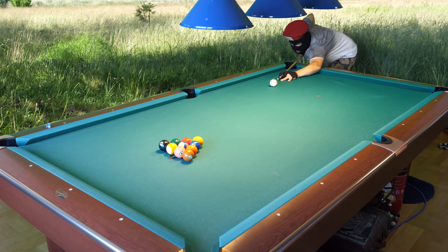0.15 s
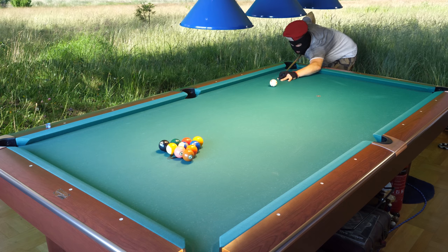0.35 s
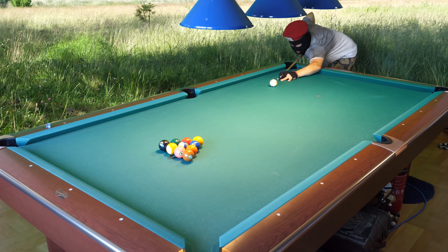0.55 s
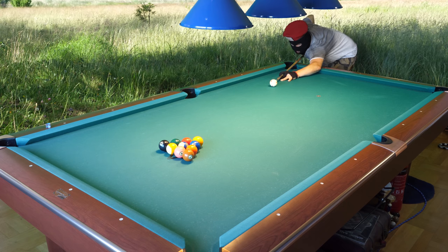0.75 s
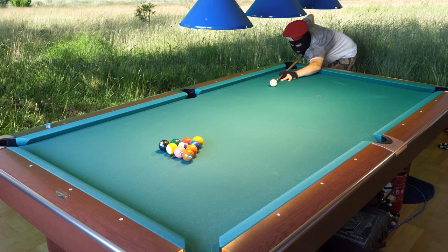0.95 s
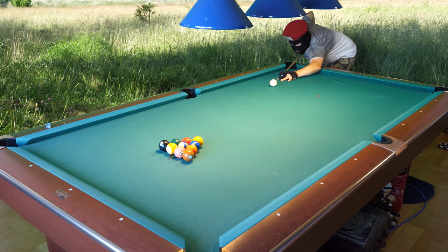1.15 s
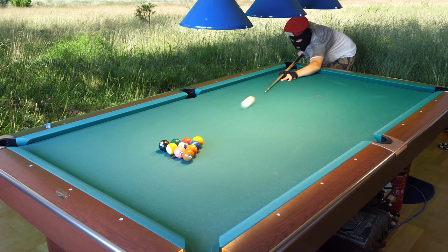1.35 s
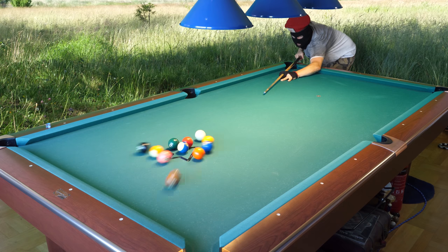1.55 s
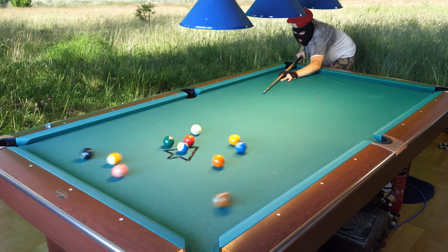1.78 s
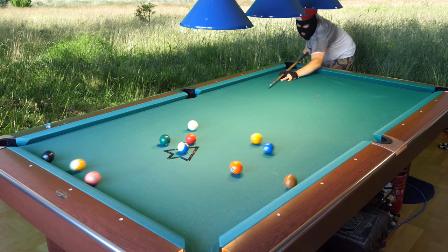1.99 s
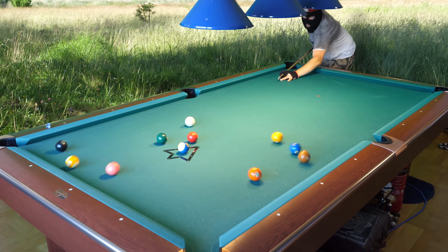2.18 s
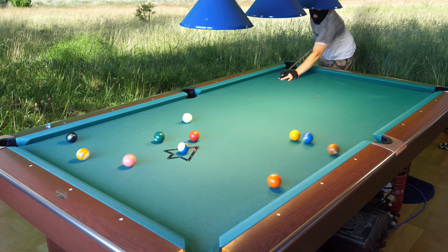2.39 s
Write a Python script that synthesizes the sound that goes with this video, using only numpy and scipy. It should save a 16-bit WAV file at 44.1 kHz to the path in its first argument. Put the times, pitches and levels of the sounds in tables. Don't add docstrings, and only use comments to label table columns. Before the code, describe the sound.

A billiard break shot cracks sharply into the rack, followed by cushion thuds and stray ball clicks

```python
import sys
import numpy as np
from scipy import signal
from scipy.fft import rfft, irfft, next_fast_len
from scipy.io import wavfile
from scipy.ndimage import uniform_filter1d, minimum_filter1d

SR = 44100
rng = np.random.default_rng(int(sys.argv[2]) if len(sys.argv) > 2 else 0)


def transcribe(u):
    v = np.clip(np.atleast_2d(u).T, -1, 1)
    q = np.round(v * 32767).astype(np.int16)
    wavfile.write(sys.argv[1], SR, q)


def volts_from_decibels(level):
    exponent = np.asarray(level, float) / 20
    return 10 ** exponent


N = 106942


def unit(x):
    return x / np.sqrt(np.mean(x ** 2) + 1e-20)


def along(points, hz):
    f, v = np.transpose(points)
    return np.interp(np.log(hz + 1), np.log(f + 1), v)


def filtered(x, response):
    m = next_fast_len(x.shape[-1] + 8192)
    hz = np.fft.rfftfreq(m, 1 / SR)
    return irfft(rfft(x, m) * response(hz), m)[..., :x.shape[-1]]


def resonance(hz, centre, width):
    return 1j * hz * width / (centre * centre - hz * hz + 1j * hz * width)


def pair(noise, alike):
    def weights(hz):
        turn = np.arccos(np.clip(along(alike, hz), -1, 1)) / 2
        return np.array([np.cos(turn), np.sin(turn)])
    mid, side = filtered(noise, weights)
    return np.array([mid + side, mid - side])


def rush(spectrum, alike):
    noise = pair(rng.standard_normal((2, N)), alike)
    return unit(filtered(noise, lambda hz: volts_from_decibels(along(spectrum, hz))))


def ring(modes, scatter_db, attack_s):
    t = np.arange(SR // 2) / SR
    tones = np.zeros(len(t))
    for hz, db, t60 in modes:
        level = db + scatter_db * rng.normal()
        tones += volts_from_decibels(level - 60 * t / t60) * np.sin(2 * np.pi * hz * t)
    return tones * (1 - np.exp(-t / attack_s))


def add(track, s, sound):
    k = round(s * SR)
    track[..., k:k + sound.shape[-1]] += sound[..., :track.shape[-1] - k]


# (frequency [Hz], level [dB/Hz])
BALL_SPECTRUM = [(250, -28), (800, -14), (1800, 1.5), (2800, -2.5), (3700, -18), (4600, -35), (7000, -43),
                 (16000, -43.5)]
# (frequency [Hz], level [dB], T60 [s])
BALL_MODES = [(14200, -29, .003), (12000, -38, .003)]


def click(sharp=1):
    hz = np.fft.rfftfreq(4096, 1 / SR)
    cepstrum = irfft(np.log(volts_from_decibels(along(BALL_SPECTRUM, hz / sharp))))
    cepstrum[1:2048] *= 2
    cepstrum[2049:] = 0
    swing = irfft(np.exp(rfft(cepstrum)))
    return swing / np.abs(swing).max() + ring(BALL_MODES, 1, .0002)[:4096]


RACK_S, RACK_DB = 1.545, 18
SPREAD_S, FADE_DB = .012, 20
RACK_SHARP, SHARP_SCATTER = 1.105, .13
ROOM_DB = 12


def rack():
    out, burst = np.zeros((2, N)), np.zeros(SR // 4)
    late = np.append(0, np.sort(rng.exponential(1, 18)))
    for u in late:
        sharp = RACK_SHARP * np.exp(SHARP_SCATTER * rng.normal())
        add(burst, SPREAD_S * u, volts_from_decibels(-FADE_DB * u) * click(sharp))
    add(out, RACK_S, volts_from_decibels(RACK_DB) * room(burst, ROOM_DB))
    return out


# (time [s], level [dB])
LONE_CLICKS = [
    (2.2874, 3),
    (2.4203, -5.5),
]


def lone_clicks():
    out = np.zeros((2, N))
    for s, db in LONE_CLICKS:
        add(out, s, volts_from_decibels(db) * room(click(), ROOM_DB))
    return out


# (frequency [Hz], width [Hz], level [dB])
TIP_RESONANCES = [(865, 110, -5), (380, 220, 1.5), (537, 400, 1.5), (1113, 710, -5), (1600, 1500, -2.5),
                  (2470, 410, 3), (200, 180, -13), (5000, 4000, 0)]
# (frequency [Hz], level [dB], T60 [s])
SHAFT_MODES = [(339.8, -4.5, 0.3), (404.5, -4.5, .15), (1102, -7, 0.078), (1447, -10, 0.12),
               (1720, -8, 0.11), (2140, -6.5, 0.17), (2482, -10, 0.36), (3000, -27.5, 0.18),
               (3273, -1.5, 0.11), (3640, -15, .15), (3880, -16.5, .15), (4820, -35.5, .12),
               (5280, -19.5, 0.15)]
# (frequency [Hz], level [dB], T60 [s])
KNOCK_MODES = [(850, -1, .07), (1150, -8, .04)]
CUE_S, CUE_DB, CUE_ROOM_DB = 1.3158, 1, 12.5
TIP_DB, SHAFT_DB, CRACK_DB = 7, -18.5, -6.5
LEATHER_S = .00025


def cue():
    out, t = np.zeros((2, N)), np.arange(SR // 2) / SR
    blow = np.sin(np.pi * np.minimum(t / LEATHER_S, 1)) ** 2
    knock = filtered(blow, lambda hz: sum(volts_from_decibels(db) * resonance(hz, c, w) for c, w, db in TIP_RESONANCES))
    sound = volts_from_decibels(TIP_DB) * knock / np.abs(knock).max()
    sound += volts_from_decibels(SHAFT_DB) * ring(SHAFT_MODES, 0, .00043)
    sound[0] += volts_from_decibels(CRACK_DB)
    add(out, CUE_S, volts_from_decibels(CUE_DB) * room(sound, CUE_ROOM_DB))
    add(out, CUE_S, volts_from_decibels(CUE_DB) * ring(KNOCK_MODES, 0, .0001))
    return out


# (time [s], level [dB])
TABLE_BLOWS = [(1.333, -13), (1.399, -11), (1.51, -10.5), (1.712, -6), (1.75, -3.5), (1.8, -18.5),
               (1.851, -24), (1.911, -25.5), (1.99, -26), (2.02, -17.5), (2.05, -16.5), (2.089, -24),
               (2.165, -14.5), (2.2, -23), (2.228, -32)]
# (frequency [Hz], level [dB], T60 [s])
TABLE_MODES = [(45, -14, .12), (82, -8, .15), (112, -4, .18), (137, -1, .18), (165, -2, .15), (231, -3, .2),
               (301, -2, .12), (361, -3, .15), (455, -7, .12), (580, -12, .08)]
# (frequency [Hz], level [dB/Hz])
PUSH_SPECTRUM = [(40, -17.5), (120, 0), (300, 2), (550, -7), (900, -21.5), (1400, -18.5), (3000, -58.5)]
PUSH_DB, PUSH_T60_S = 4, .082
RUBBER_S, THUD_SCATTER_DB, THUD_ROOM_DB = .004, 3, -1.5


def table():
    out, t = np.zeros((2, N)), np.arange(SR // 2) / SR
    envelope = volts_from_decibels(PUSH_DB - 60 * t / PUSH_T60_S) * (1 - np.exp(-t / RUBBER_S))
    for s, db in TABLE_BLOWS:
        noise = rng.standard_normal(len(t))
        push = envelope * unit(filtered(noise, lambda hz: volts_from_decibels(along(PUSH_SPECTRUM, hz))))
        body = ring(TABLE_MODES, THUD_SCATTER_DB, RUBBER_S)
        add(out, s, volts_from_decibels(db - 8) * room(body + push, THUD_ROOM_DB))
    return out


# (time [s], rise [s], level [dB])
CLOTH_SCUFFS = [
    (2.166, .028, -37),
    (.47, .02, -62),
    (2.012, .005, -62),
]
# (frequency [Hz], level [dB/Hz])
CLOTH_SPECTRUM = [(300, -31), (1000, 2.5), (1800, 5.5), (3500, -0.5), (5500, -8.5), (10000, -16),
                  (15000, -31)]
# (frequency [Hz], level [dB/Hz])
FAINT_SPECTRUM = [(1000, -26), (3300, 6.5), (7000, -3.5), (11000, 5), (15000, -23)]
SCUFF_T60_S = .43


def scuffs():
    t = np.arange(N) / SR
    swells = []
    for s, rise, db in CLOTH_SCUFFS:
        decay = volts_from_decibels(db - 60 * np.maximum(t - s - rise, 0) / SCUFF_T60_S)
        swells.append(decay * np.clip((t - s) / rise, 0, 1))
    near, *far = swells
    return near * rush(CLOTH_SPECTRUM, ROOM_ALIKE) + sum(far) * rush(FAINT_SPECTRUM, ALIKE_BY_HZ)


# (frequency [Hz], level [dB/Hz])
ROLL_SPECTRUM = [(20, -23.5), (60, 8), (200, -11.5), (600, -37), (3000, -38.5), (7000, -49.5), (15000, -47)]
ROLL_DB, ROLL_FADE_DB_PER_S = -33, 1.5


def rolling():
    t = np.arange(N) / SR - RACK_S
    return (t > 0) * volts_from_decibels(ROLL_DB - ROLL_FADE_DB_PER_S * t) * rush(ROLL_SPECTRUM, ALIKE_BY_HZ)


# (frequency [Hz], level [dB/Hz])
HUM_SPECTRUM = [(15, 0), (45, 1.5), (170, -5), (500, -20), (1500, -26.5), (3300, -32), (7000, -37),
                (15000, -40.5)]
# (frequency [Hz], left-right likeness [-1..1])
ALIKE_BY_HZ = [(60, 0.44), (160, 0.34), (450, 0.15), (1230, 0.22), (3360, -0.0)]
HUM_DB, HUM_PAN_DB = -46, .5
BUMP_DB, BUMP_T60_S, BUMP_HZ = -45.5, .65, 336


def floor():
    band = [(BUMP_HZ / 10, -20), (BUMP_HZ, 0), (2 * BUMP_HZ, -10), (10 * BUMP_HZ, -70)]
    bump = volts_from_decibels(BUMP_DB - 60 * np.arange(N) / SR / BUMP_T60_S) * rush(band, ROOM_ALIKE)
    hum = volts_from_decibels([[HUM_DB + HUM_PAN_DB], [HUM_DB - HUM_PAN_DB]]) * rush(HUM_SPECTRUM, ALIKE_BY_HZ)
    return hum + bump


# (frequency [Hz], T60 [s])
ROOM_T60 = [(100, 0.78), (500, 0.68), (1500, 0.58), (3000, 0.49), (6000, 0.37), (14000, 0.36)]
# (frequency [Hz], left-right likeness [-1..1])
ROOM_ALIKE = [(100, 0.67), (500, 0.72), (1500, 0.61), (3000, 0.11), (8000, 0.19)]
# (delay [s], level [dB])
WALL_ECHOES = [(.0024, -2), (.0052, 2), (.0065, 0), (.012, 1), (.014, 0), (.026, -4), (.039, -3)]
BUILD_S = .0031


def room(x, wet_db):
    noise = pair(rng.standard_normal((2, SR)), ROOM_ALIKE)
    hz, t, z = signal.stft(noise, SR, nperseg=256)
    decay = volts_from_decibels(-60 * t / along(ROOM_T60, hz)[:, None])
    tail = signal.istft(z * decay, SR, nperseg=256)[1][:, :SR]
    tail *= 1 - np.exp(-np.arange(SR) / SR / BUILD_S)
    answer = volts_from_decibels(wet_db) * tail / np.linalg.norm(tail[0])
    answer[:, 0] = 1
    for s, db in WALL_ECHOES:
        arrival = round(s * SR) + rng.integers(-6, 7, 2)
        answer[[0, 1], arrival] += volts_from_decibels(db + wet_db - ROOM_DB)
    return signal.fftconvolve(x[None], answer, axes=1)


def scene():
    return rack() + lone_clicks() + cue() + table() + scuffs() + rolling() + floor()


def band_limit(x):
    return signal.sosfilt(signal.butter(12, 15800, fs=SR, output="sos"), x)


LIMIT_TOP, LIMIT_S = 3.5, .0003
CLIP_TOP, CLIP_KNEE = .93, 16
MIC_HZ, MIC_WIDTH_HZ, MIC_LIFT = 10000, 1300, .55
DIP_HZ, DIP_WIDTH_HZ, DIP = 6570, 6800, .46


def record(dry):
    size = round(LIMIT_S * SR) + 1
    need = LIMIT_TOP / np.maximum(np.abs(dry), LIMIT_TOP)
    limited = dry * uniform_filter1d(minimum_filter1d(need, size), size)
    clipped = limited / (1 + np.abs(limited / CLIP_TOP) ** CLIP_KNEE) ** (1 / CLIP_KNEE)

    def colour(hz):
        peak = 1 + MIC_LIFT * resonance(hz, MIC_HZ, MIC_WIDTH_HZ)
        return peak * (1 - DIP * resonance(hz, DIP_HZ, DIP_WIDTH_HZ))
    return band_limit(filtered(clipped, colour))


dry = scene()
out = record(dry)
transcribe(out)
```